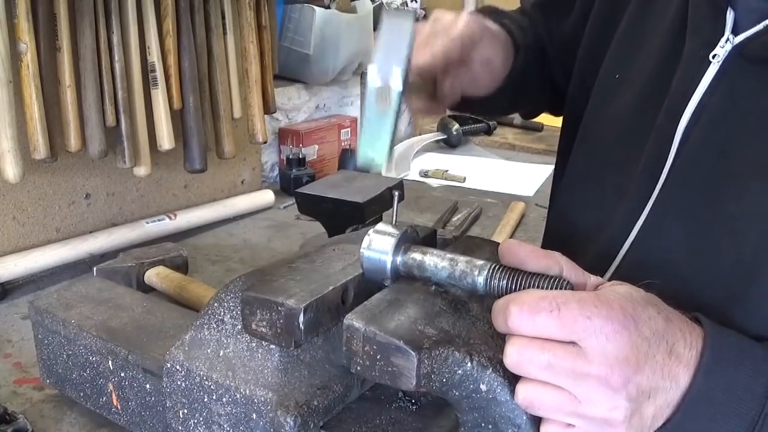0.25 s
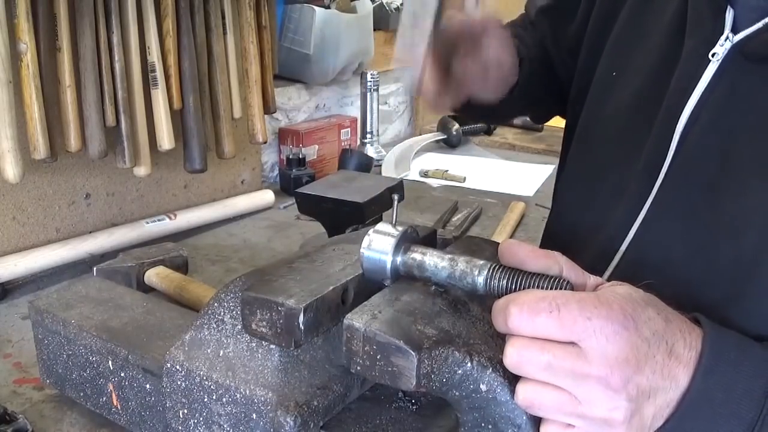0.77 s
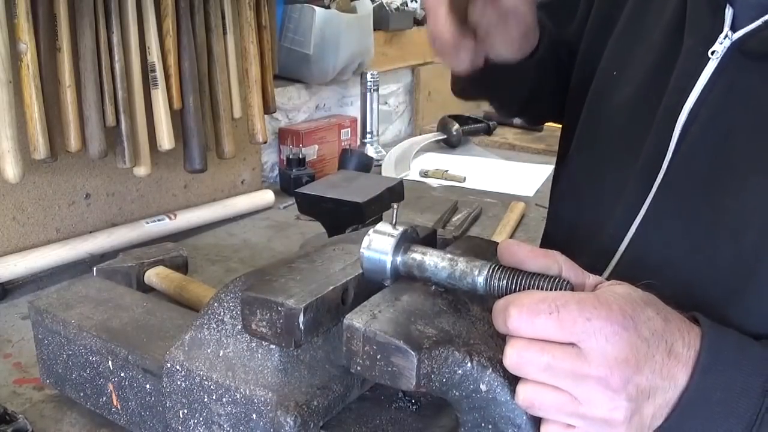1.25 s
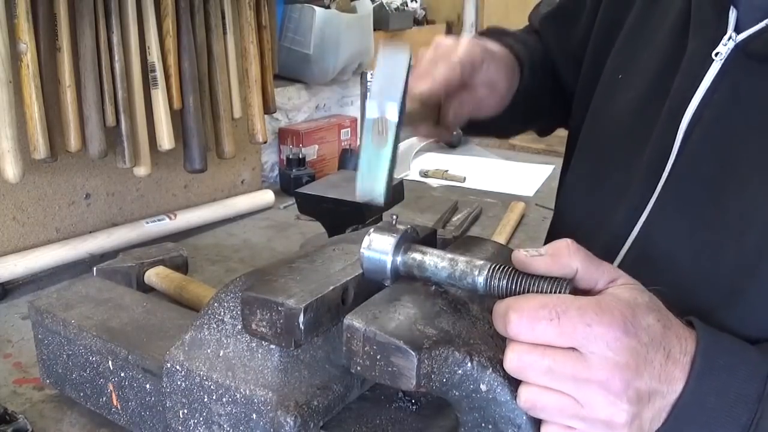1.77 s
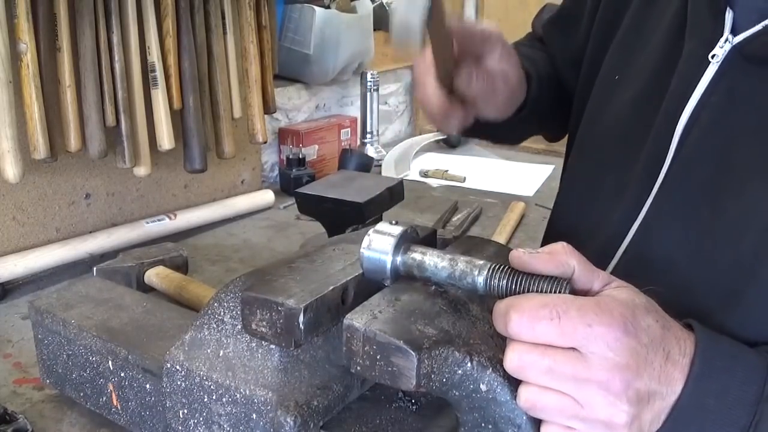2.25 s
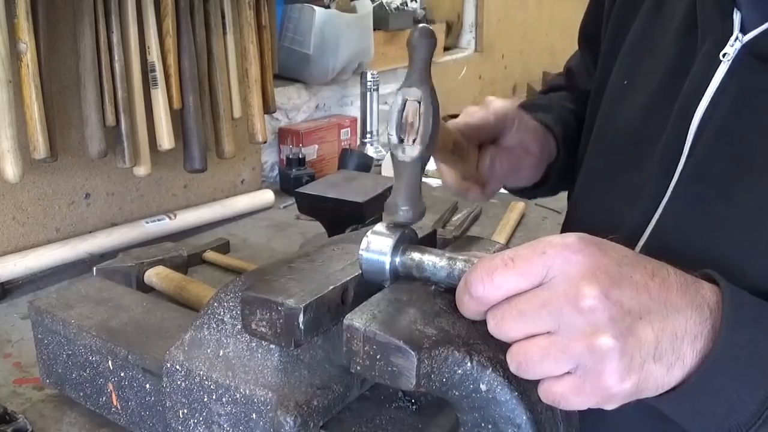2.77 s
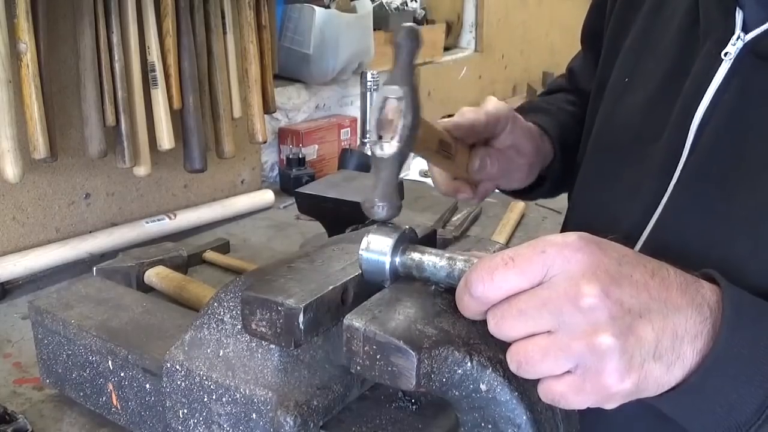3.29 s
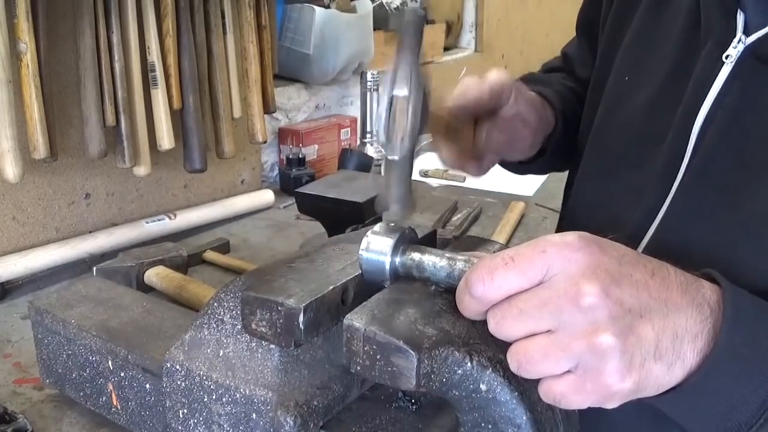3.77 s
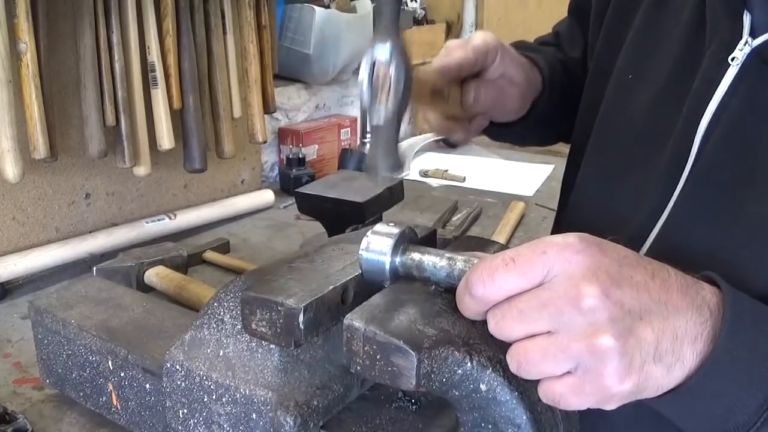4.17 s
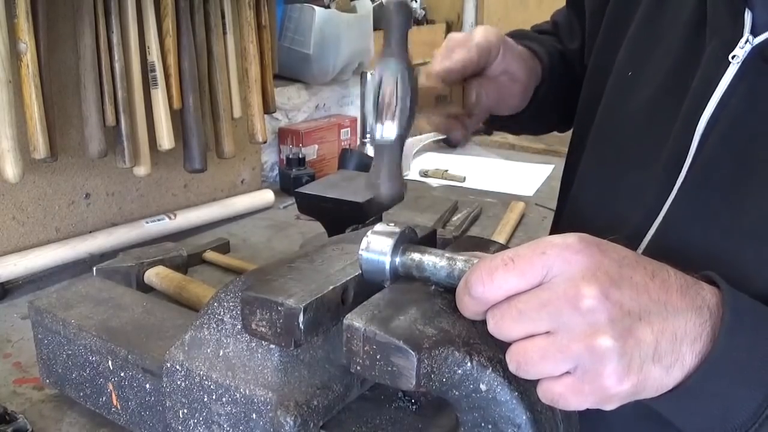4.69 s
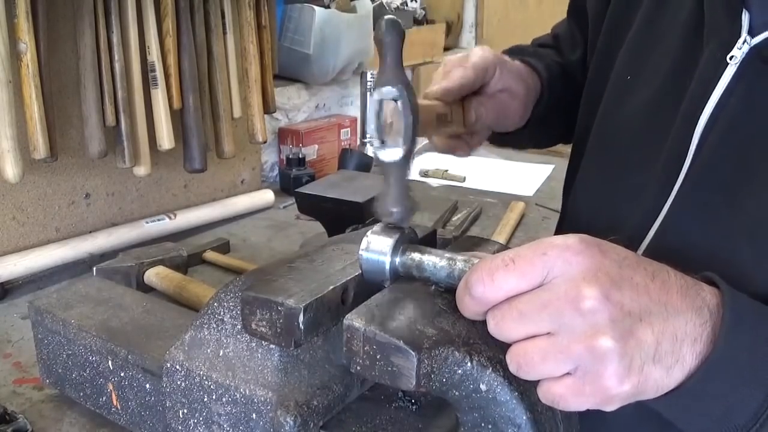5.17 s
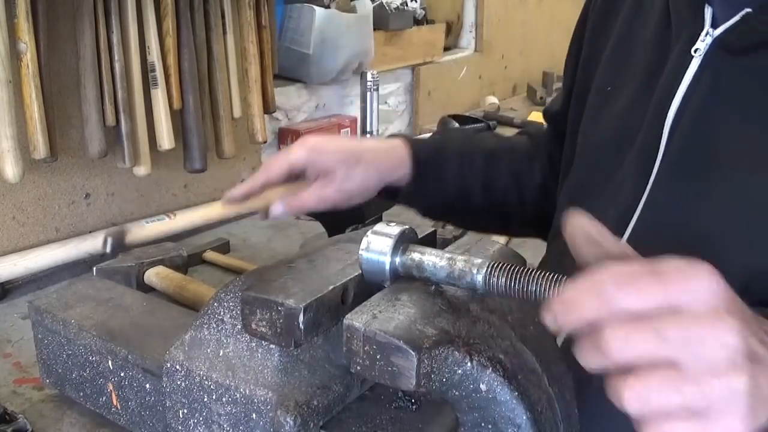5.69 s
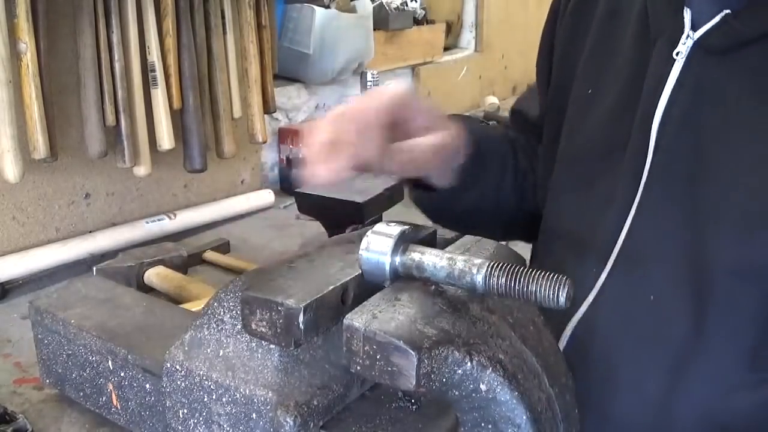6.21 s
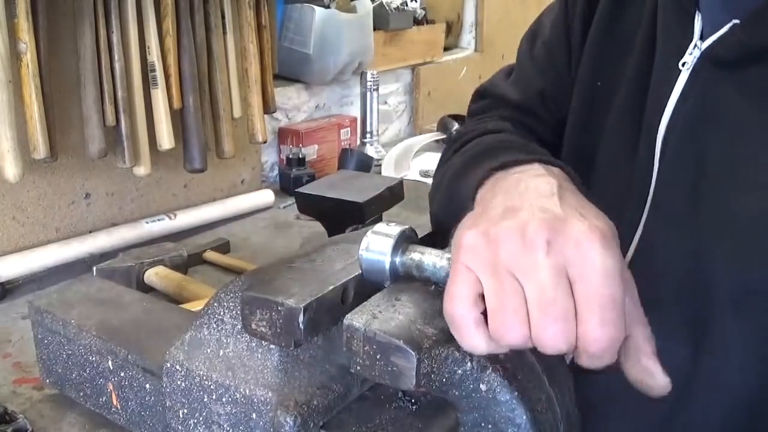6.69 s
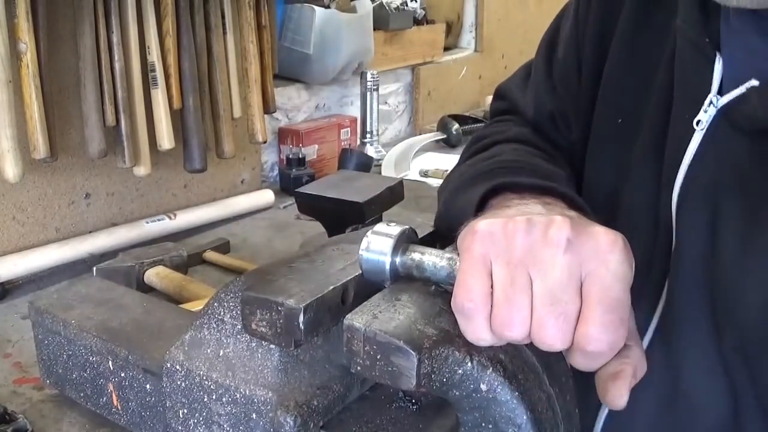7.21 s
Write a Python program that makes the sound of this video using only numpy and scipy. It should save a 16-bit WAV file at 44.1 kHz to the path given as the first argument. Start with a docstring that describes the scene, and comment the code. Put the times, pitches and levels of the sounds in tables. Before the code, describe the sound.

A small workshop with faint steady air and a short, bright reverberation of under half a second. At 0 s a hammer blow on steel is already ringing. Eight flat-faced blows follow evenly, every 0.3 s from 0.23 to 2.35 s, clanging around 1 to 3 kHz with a low bench boom; the last sounds heavier and more solid. A lighter ball-hammer tap comes at 2.6 s, then ten strong blows about every 0.26 s from 2.8 to 5.16 s, harder, broader cracks with a high 7 kHz ring. The ring fades, with a barely audible click at 5.6 s. At 5.95 s the hammer handle knocks on wood, then at 6.13 s its head lands and clanks, bouncing rapidly. A barely audible rub passes near 6.5 s. From 6.8 to 7.3 s the bolt clicks and knocks in the jaws, with thumps, hissing rubs and low rumble. Peaks are compressed.

```python
"""A hammer blow on a rivet is already ringing, and eight more flat-faced blows follow in a small workshop.
Then a ball hammer peens the rivet in its steel bolt, held in a bench vise. The bolt clicks in the jaws,
the hammer drops and bounces on the wooden bench, and a hand takes hold of the bolt, rubbing and rumbling.
Steel and wood are sums of decaying resonances with short coloured pulses; rubs, rumble and air are
filtered noise. Two close capsules hear the room answer each blow; the camera's limiter flattens attacks."""
import sys
import numpy as np
from scipy import signal
from scipy.fft import rfft, irfft, next_fast_len
from scipy.io import wavfile
from scipy.ndimage import uniform_filter1d

SR = 44100
rng = np.random.default_rng(int(sys.argv[2]) if len(sys.argv) > 2 else 0)


def wrap_up_sound(samples):
    """Save the sound to the file named by the first command line argument, as 16-bit audio."""
    columns = np.atleast_2d(samples).T
    # keep every value between -1 and 1, then stretch to whole-number steps
    tamed = np.clip(columns, -1, 1)
    steps = np.round(tamed * 32767).astype(np.int16)
    wavfile.write(sys.argv[1], SR, steps)


N = 328545
LEAD = SR // 4  # samples played before the start, so that an earlier blow can ring on
T = np.arange(SR) / SR  # time axis of one struck sound [s]


def amp(db):
    """Decibels to gain."""
    return 10 ** (np.asarray(db) / 20)


def unit(x):
    """Scale to an energy of one."""
    return x / np.sqrt(np.sum(x ** 2) + 1e-20)


def along(points, hz):
    """Read (frequency, value) points on a log frequency axis."""
    point_hz, value = np.transpose(points)
    return np.interp(np.log(hz + 1), np.log(point_hz + 1), value)


def filtered(x, response):
    """Multiply the spectrum of x by a function of frequency."""
    n = x.shape[-1]
    padded = next_fast_len(n + 8192)
    spectrum = rfft(x, padded) * response(np.fft.rfftfreq(padded, 1 / SR))
    return irfft(spectrum, padded)[..., :n]


def add(track, s, sound):
    """Mix a sound into the track at time s."""
    start = max(round(s * SR) + LEAD, 0)
    part = track[:, start:start + sound.shape[-1]]
    part += sound[..., :part.shape[-1]]


def ring(modes, attack=.0001, scatter_db=1):
    """Struck resonances: decaying sines, weighted by width, at slightly new strengths each time."""
    hz, width, db = np.transpose(modes)[:, :, None]
    signs = (-1) ** np.arange(len(hz))[:, None]
    size = amp(db + scatter_db * rng.standard_normal(hz.shape)) * width * signs
    t = T.astype(np.float32)
    decay = np.exp(np.maximum(np.float32(-np.pi * width) * t, -20))  # a wider mode dies sooner
    tones = np.float32(size) * decay * np.sin(np.float32(2 * np.pi * hz) * t)
    onset = 1 - np.exp(-np.minimum(T / attack, 10) ** 2)
    return unit(tones.sum(0) * onset)


def pulse(spectrum, size=4096, low_hz=110):
    """A causal contact pulse of the given colour; small things radiate little bass."""
    hz = np.fft.rfftfreq(size, 1 / SR)
    bass_loss = (hz + 1) ** 2 / (hz ** 2 + low_hz ** 2)
    cepstrum = irfft(np.log(amp(along(spectrum, hz)) * bass_loss))
    # folding the cepstrum gives minimum phase: the energy comes as early as it can
    cepstrum[1:size // 2] *= 2
    cepstrum[size // 2 + 1:] = 0
    return np.pad(unit(irfft(np.exp(rfft(cepstrum)))), (0, len(T) - size))


# spread between the two capsules: (frequency [Hz], side relative to mid [dB])
SIDE_LEVEL = [(60, -29), (110, -14), (200, -16), (1000, -8), (5000, -7.5), (10000, -10)]


def pair(n):
    """Diffuse noise at two close capsules: alike in the bass, wider above."""
    mid, side = rng.standard_normal((2, n))
    side = filtered(side, lambda hz: amp(along(SIDE_LEVEL, hz)))
    return np.array([mid + side, mid - side])


# reverberation of the workshop: (frequency [Hz], time to fall by 60 dB [s])
ROOM_DECAY = [(60, 0.49), (250, 0.49), (1000, 0.45), (2500, 0.38), (5000, 0.42), (10000, 0.31)]
TAIL = round(.7 * SR)  # length of the room response [samples]
BUILD_CYCLES = 3.2  # low notes need this many cycles to fill the room


def workshop(x, direct_db, room_db, build):
    """The direct sound and a fresh tail that builds up over build seconds, the bass last."""
    hz, t, grid = signal.stft(pair(TAIL), SR, nperseg=256)
    cycles = (t + t[1] / 2) * (hz[:, None] + hz[1] / 2)
    swell = 1 - np.exp(-(cycles / BUILD_CYCLES) ** 2)
    fade = amp(-60 * t / along(ROOM_DECAY, hz)[:, None])
    tail = signal.istft(grid * swell * fade, SR, nperseg=256)[1][:, :TAIL]
    response = amp(room_db) * unit(tail * (1 - np.exp(-T[:TAIL] / build)))
    response[:, 0] += amp(direct_db)
    wet = signal.fftconvolve(x[None], response, axes=1)[:, :len(T)]
    return unit(wet) * np.sqrt(np.sum(x ** 2) * np.sum(response ** 2))  # every blow keeps its own energy


# colour of the workshop's background: (frequency [Hz], level [dB])
AIR_COLOUR = [(15, -31), (25, -9.5), (141, -5.5), (288, -6.5), (444, -5), (559, -8), (2000, -12.5),
              (2210, -14), (4070, -11.5), (11000, -20), (14300, -50), (22000, -120)]


def air():
    """The quiet background of the workshop, as steady coloured noise."""
    noise = filtered(pair(N + LEAD), lambda hz: amp(along(AIR_COLOUR, hz)))
    return amp(-61) * noise / noise.std()


# the dry snap of steel meeting steel: (frequency [Hz], level [dB])
SNAP_COLOUR = [(200, -51.5), (1000, -14), (2500, -13), (4000, -7.5), (6000, 1.5), (8500, 1), (11000, -10.5)]
SNAP_S = 0.011  # decay time constant [s]


def snap():
    """A brief burst of bright noise, heard directly at the microphone without the room."""
    noise = filtered(pair(len(T)), lambda hz: amp(along(SNAP_COLOUR, hz)))
    return unit(noise * np.exp(-T / SNAP_S))


# flat-face blows, the first still ringing at the start:
# (time [s], strength [dB], hammer ring relative to it [dB], ping relative to it [dB])
FLAT_BLOWS = [(-.075, 22.5, -25, -18), (0.231, 23, -20, -20.5), (0.539, 24, -15, -14.5),
              (0.845, 23, -4.5, -17.5), (1.141, 24.5, -21, -21.5), (1.454, 23.5, -11.5, -16),
              (1.751, 20.5, -8.5, -41), (2.053, 22, 0, -16), (2.349, 26.5, -23.5, -13.5)]
# standing rivet and bolt: (frequency [Hz], width [Hz], level [dB])
SHANK_MODES = [(360, 50, -6.5), (979.7, 29.4, 6), (1091, 49, -2.5), (1780, 73, 6.5), (1913, 9.9, 10),
               (2062, 20, 8.5), (2265, 31, 0), (2480, 10, -2.5), (2541, 40, 9), (2783, 14, 7.5),
               (3053, 36, -3.5), (3336, 13, -3), (4200, 77, -17.5), (4940, 110, -11), (5130, 50, -3.5),
               (5780, 40, -15), (7430, 50, -7.5)]
# colour of the flat face's crack: (frequency [Hz], level [dB])
FLAT_CRACK_COLOUR = [(120, 6.5), (300, 2.5), (650, -5.5), (1400, 2), (1650, 1), (2400, 3.5), (3000, -2),
                     (3900, -8.5), (5000, -1.5), (6400, -10), (8200, -3), (11000, -9)]
# the flat hammer's own note: (frequency [Hz], width [Hz], level [dB])
FLAT_HEAD_MODES = [(10560, 30, 0)]
# modes that depend on where the face lands: (frequency [Hz], width [Hz], level [dB])
PING_MODES = [(3420, 12, -2), (4350, 16, -15)]
# low boom of the bench: (frequency [Hz], width [Hz], level [dB])
BENCH_MODES = [(47, 3.9, -3), (56.7, 6.4, -5), (69.75, 1.8, 3), (91.7, 2, -2), (172, 9, -8.5)]
# bolt and vise under the seated rivet: (frequency [Hz], width [Hz], level [dB])
SEATED_MODES = [(333, 46, -12), (622.4, 25, -3.5), (764, 37, -6), (1038, 45, 1), (1164, 83, -2.5),
                (1326, 49, 2), (1625, 10, 0.5), (2140, 14, 3), (2396, 140, 0), (2613, 69, 3),
                (2830, 12, -1.5), (2980, 62, -3), (3344, 24, 3), (3970, 20, 2), (4310, 8.3, -3),
                (5360, 89, -11), (6070, 23, -7.5), (9000, 150, -11)]
# colour of the ball's crack, also in the seating blow: (frequency [Hz], level [dB])
BALL_CRACK_COLOUR = [(120, -7), (300, -8), (550, -16.5), (850, -9.5), (1500, -1.5), (2500, 1.5), (3700, 2),
                     (5000, -9), (7200, -7.5), (8300, -14.5), (9300, -14.5), (11000, -23.5)]
# vise jaws, heard again under the hand: (frequency [Hz], width [Hz], level [dB])
JAW_MODES = [(428, 34, 6.5), (736, 360, 4.5), (1100, 29, -13.5), (1347, 250, -2.5), (1750, 120, -22.5),
             (2730, 110, -24)]
# long, faint ring of the vise: (frequency [Hz], width [Hz], level [dB])
VISE_MODES = [(452.2, 1.3, -5), (2019, 2.1, -4), (3924, 4, -16)]
SEATED_FROM = 2.2  # from this time [s] the rivet is seated in the bolt
FLAT_CRACK_DB, FLAT_SNAP_DB = -5.5, -19  # relative to the strength of the blow


def flat_blows(track):
    """The flat face drives the standing shank, which rings in a few strong bands; the last blow seats it."""
    for s, db, head_db, ping_db in FLAT_BLOWS:
        steel = ring(SHANK_MODES)
        crack = amp(FLAT_CRACK_DB) * pulse(FLAT_CRACK_COLOUR)
        head = amp(head_db) * ring(FLAT_HEAD_MODES, attack=0.00035)
        force = amp(db) * amp([[.4], [-.4]])  # slightly to the left
        add(track, s, force * workshop(steel, direct_db=-30, room_db=-0.5, build=0.004))
        add(track, s, force * workshop(crack, direct_db=-29, room_db=-0.5, build=0.003))
        add(track, s, force * workshop(head, direct_db=-4.5, room_db=-3.5, build=.002))
        add(track, s, force * amp(FLAT_SNAP_DB) * snap())
        add(track, s, force * amp(ping_db) * ring(PING_MODES, attack=0.012))
        add(track, s, amp(1.5) * ring(BENCH_MODES, attack=0.0036))  # the same whatever the strength
        if s > SEATED_FROM:  # the whole vise now takes the blow
            vise = amp(-10.0) * ring(SEATED_MODES) + amp(-6) * pulse(BALL_CRACK_COLOUR)
            vise += amp(-15.5) * ring(JAW_MODES) + amp(-27) * ring(VISE_MODES)
            add(track, s, force * workshop(vise, direct_db=-33, room_db=1, build=0.004))


# ball blows: (time [s], strength [dB], hammer ring relative to it [dB])
BALL_BLOWS = [(2.604, 14.5, -9), (2.786, 23.5, -12.5), (3.05, 23.5, -17), (3.311, 24.5, -22.5),
              (3.576, 25, -13), (3.828, 25.5, -6), (4.089, 24, -15.5), (4.358, 26, -11), (4.621, 25, -8),
              (4.885, 21, -9), (5.164, 24.5, -14.5)]
# the ball hammer's own notes: (frequency [Hz], width [Hz], level [dB])
BALL_HEAD_MODES = [(6999, 13, 0), (7012, 16, -4), (10640, 12, -20)]
BALL_CRACK_DB, BALL_SNAP_DB = -1.85, -15.5  # relative to the strength of the blow


def ball_blows(track):
    """The ball meets the seated head: a harder, broader crack and the hammer's own high note."""
    for s, db, head_db in BALL_BLOWS:
        steel = amp(-3.0) * ring(SEATED_MODES, scatter_db=2) + amp(-28.5) * ring(VISE_MODES)
        crack = amp(BALL_CRACK_DB) * pulse(BALL_CRACK_COLOUR)
        head = amp(head_db) * ring(BALL_HEAD_MODES, attack=0.0017)
        force = amp(db) * amp([[.2], [-.2]])
        add(track, s, force * workshop(steel, direct_db=-26.5, room_db=-0.5, build=.0005))
        add(track, s, force * workshop(crack, direct_db=-22, room_db=-0.5, build=.0004))
        # the note swells in the room
        add(track, s, force * workshop(head, direct_db=-6.5, room_db=-3.5, build=0.0033))
        add(track, s, force * amp(BALL_SNAP_DB) * snap())
        add(track, s, force * amp(-31) * ring(BENCH_MODES, attack=.015))


# the bolt shifts in the jaws: (time [s], click [dB], knock [dB], thump [dB])
BOLT_SHIFTS = [(5.631, -33, -39, -60), (6.823, 6, 4, 2.5), (6.99, -12, -25, -24), (7.078, 4.5, -26, -16),
               (7.178, -4.5, -1, 2), (7.300, -20, 8.5, -12.5)]
# the clicking bolt: (frequency [Hz], width [Hz], level [dB])
BOLT_MODES = [(600, 70, -17), (1016, 50, 3.5), (1280, 130, -12), (1930, 130, -5.5), (2600, 120, -31),
              (3350, 90, -15)]
# colour of the click: (frequency [Hz], level [dB])
CLICK_COLOUR = [(100, -4), (1200, -2.5), (3000, -16.5), (5000, -20), (10500, -20)]
# colour of the knock: (frequency [Hz], level [dB])
KNOCK_COLOUR = [(80, 8), (220, -2.5), (420, 2), (1900, -8), (4000, -23.5), (10000, -72)]
# the vise rocks the bench: (frequency [Hz], width [Hz], level [dB])
THUMP_MODES = [(42.4, 8, -11.5), (54, 14, -27), (74.3, 22, -3.5), (126, 20.5, -6.5)]
CHATTER_S, THUMP_DELAY_S = 0.012, .0124  # a contact chatters for a moment; the heavy bench follows late


def grip(track):
    """The bolt clicks and knocks in the jaws under the hand, each contact smeared by a short rattle."""
    for s, click_db, knock_db, thump_db in BOLT_SHIFTS:
        click = amp(click_db) * (ring(BOLT_MODES) + amp(-6.0) * pulse(CLICK_COLOUR))
        knock = amp(knock_db) * (ring(JAW_MODES) + amp(-0.5) * pulse(KNOCK_COLOUR))
        rattle = unit(rng.standard_normal(len(T)) * np.exp(-T / CHATTER_S))
        chatter = signal.fftconvolve(click + knock, rattle)[:len(T)]
        contact = amp(-10) * (click + knock) + chatter
        add(track, s, workshop(contact, direct_db=-1.5, room_db=-6.0, build=0.0009))
        add(track, s + THUMP_DELAY_S, amp(thump_db) * ring(THUMP_MODES, attack=0.031))


BOUNCE_SHRINK = .94  # each flight over the one before


def bounces(s, flight, count):
    """The times of a landing and its ever shorter bounces."""
    flights = flight * BOUNCE_SHRINK ** np.arange(count)
    return s + np.cumsum(flights) - flights


# the hammer lands on the bench, handle first, then tips onto its head:
# (time [s], wood [dB], steel [dB], first flight [s])
HAMMER_LANDINGS = [(5.953, 20.5, -0.5, .023), (6.121, 9, -28, 0.028), (6.137, 19, 14.5, .034)]
# colour of the knock on wood: (frequency [Hz], level [dB])
WOOD_COLOUR = [(40, -51.5), (130, -23), (250, -6), (500, -5), (900, -15.5), (1800, -23), (4000, -36.5),
               (5500, -46), (11000, -42.5)]
# bench top: (frequency [Hz], width [Hz], level [dB])
BOARD_MODES = [(203.7, 30, 3), (235, 18, 8.5), (276, 27, 4.5), (352, 46, -3), (391, 15, 2.5),
               (497, 50, -18.5), (695, 45, -27.5)]
# hammer against other tools: (frequency [Hz], width [Hz], level [dB])
TOOL_MODES = [(3210, 50, 1.5), (3480, 50, -8), (3800, 40, -8), (4130, 50, 1), (5260, 45, -14),
              (5835, 45, -16), (6450, 40, -9), (6720, 50, -12), (7480, 22, -6), (8320, 50, -15),
              (9100, 35, -6), (9490, 45, -10), (10560, 45, -15)]
# colour of the clatter of steel: (frequency [Hz], level [dB])
CLATTER_COLOUR = [(200, -12), (700, 1.5), (1600, 10), (2500, 7.5), (4000, 0.5), (6000, -10), (10500, -12)]
BOARD_DB = 0.5  # the boom of the bench top over the knock of the wood
WOOD_LOSS_DB, STEEL_LOSS_DB = 3, 3  # lost at every bounce


def hammer_drop(track):
    """The hammer thumps on the boards and clanks against the other tools; every landing bounces and weakens."""
    wood_side, steel_side = amp([[-1.1], [1.1]]), amp([[.4], [-.4]])  # left and right gains
    for start, wood_db, steel_db, flight in HAMMER_LANDINGS:
        for k, s in enumerate(bounces(start, flight, count=4)):
            wood = amp(wood_db - WOOD_LOSS_DB * k) * pulse(WOOD_COLOUR)
            board = amp(wood_db + BOARD_DB - WOOD_LOSS_DB * k) * ring(BOARD_MODES)
            clank = ring(TOOL_MODES, scatter_db=4) + amp(-1.0) * pulse(CLATTER_COLOUR)
            steel = amp(steel_db - STEEL_LOSS_DB * k) * clank
            add(track, s, wood_side * workshop(wood, direct_db=-14, room_db=-2.5, build=0.0022))
            add(track, s, wood_side * workshop(board, direct_db=-9.5, room_db=-4.5, build=.001))
            add(track, s, steel_side * workshop(steel, direct_db=-19, room_db=-1.5, build=0.00094))


# skin and sleeve slide on steel: (time [s], length [s], centre [Hz], width [octaves], level [dB])
RUB_STROKES = [(6.487, 0.066, 8700, 0.25, -59), (6.895, .1, 4810, 0.19, -39.5),
               (6.959, 0.14, 4220, 0.25, -43.5), (7.209, 0.081, 6200, 0.5, -48)]


def rubs(track):
    """Short strokes of skin and cloth hiss in one band each."""
    for s, length, centre_hz, octaves, db in RUB_STROKES:
        def band(hz):
            return np.exp(-.5 * (np.log2((hz + 1) / centre_hz) / octaves) ** 2)
        hiss = filtered(pair(round(length * SR)), band)
        stroke = hiss / hiss.std() * signal.windows.tukey(hiss.shape[1], .5)
        add(track, s, amp(db) * stroke)


# rumble of the bench under the hand: (frequency [Hz], level [dB])
RUMBLE_COLOUR = [(20, -16.5), (40, -0.5), (75, 5), (110, -11), (170, -9.5), (350, -14.5), (700, -16.5),
                 (2000, -32), (10000, -37)]
LEAN_S, LEAN_DB, LEAN_FADE_DB_PER_S = 6.815, -42, 5  # the hand settles on the vise


def lean(track):
    """The bench rumbles under the weight of the hand, less as it comes to rest."""
    noise = filtered(pair(len(T)), lambda hz: amp(along(RUMBLE_COLOUR, hz)))
    onset = 1 - np.exp(-T / 0.0097)
    level = amp(LEAN_DB - LEAN_FADE_DB_PER_S * T)
    add(track, LEAN_S, level * onset * noise / noise.std())


def limiter(x, ceiling_db=-13.0, release_db=110, window=0.0013, attack=0.0011, deaf_hz=260):
    """The gain drops fast on a loud blow and returns at release_db a second; the detector slights the bass."""
    heard = filtered(x, lambda hz: hz / np.hypot(hz, deaf_hz))
    power = np.abs(uniform_filter1d(np.mean(heard ** 2, 0), max(round(window * SR), 1)))
    over = np.maximum(10 * np.log10(power + 1e-12) - ceiling_db, 0)
    ramp = release_db * np.arange(x.shape[1]) / SR
    held = np.maximum.accumulate(over + ramp) - ramp  # highest excess so far, less its release
    return x * amp(-uniform_filter1d(held, max(round(attack * SR), 1)))


TOP_HZ = 11100  # upper edge of the camera's band


def scene():
    """All sounds of the bench, through the camera's limiter."""
    track = air()
    for source in (flat_blows, ball_blows, grip, hammer_drop, rubs, lean):
        source(track)
    band_limited = filtered(track, lambda hz: 1 / (1 + (hz / TOP_HZ) ** 140))
    return limiter(band_limited)[:, LEAD:]


def record(dry):
    """The camera rounds off the highest peaks and rolls off both ends of its band."""
    rounded = dry / (1 + (dry / .7) ** 4) ** .25
    return filtered(rounded, lambda hz: hz / np.hypot(hz, 25) / np.sqrt(1 + (hz / TOP_HZ) ** 50))


dry = scene()
out = record(dry)
wrap_up_sound(out)
```